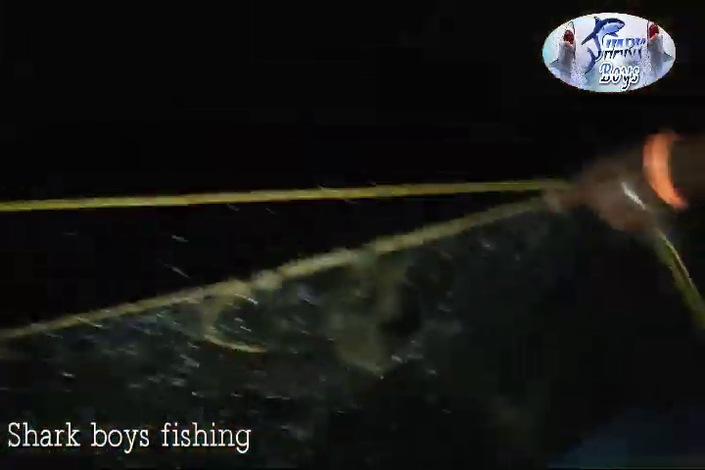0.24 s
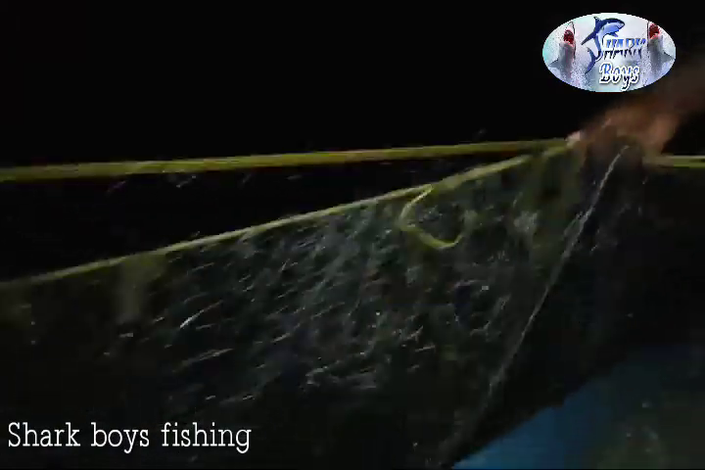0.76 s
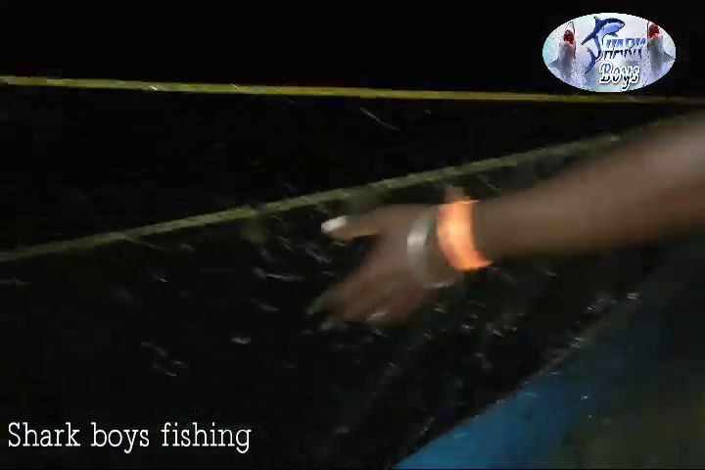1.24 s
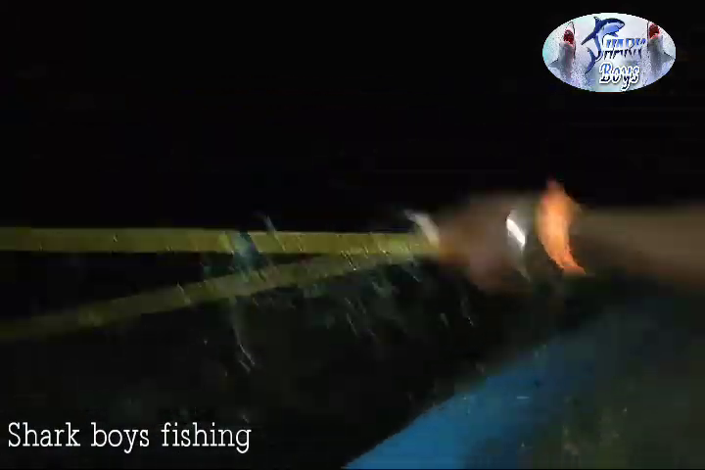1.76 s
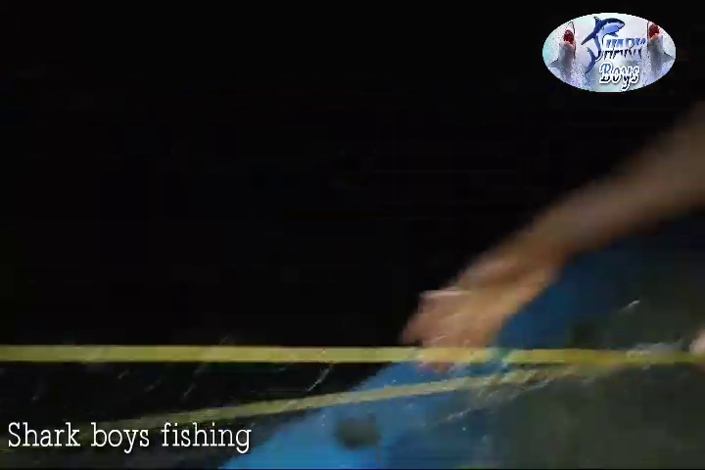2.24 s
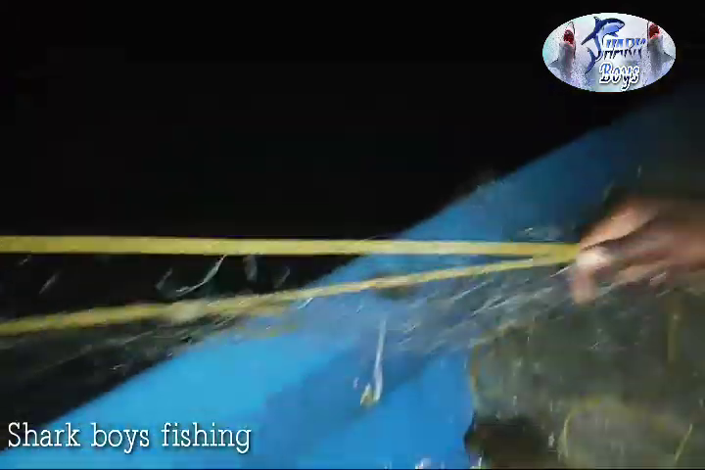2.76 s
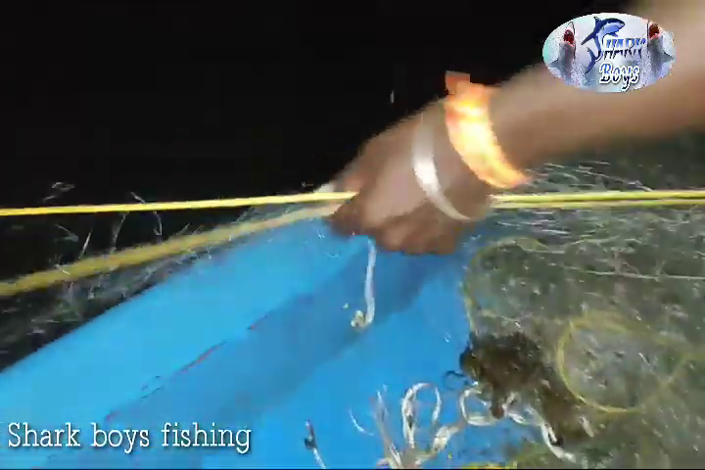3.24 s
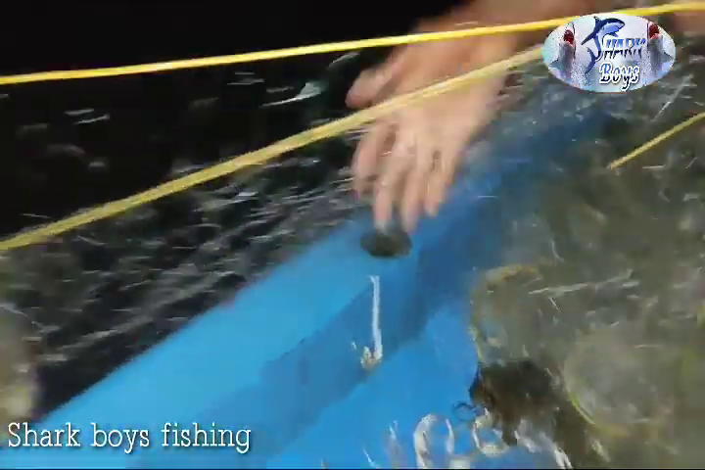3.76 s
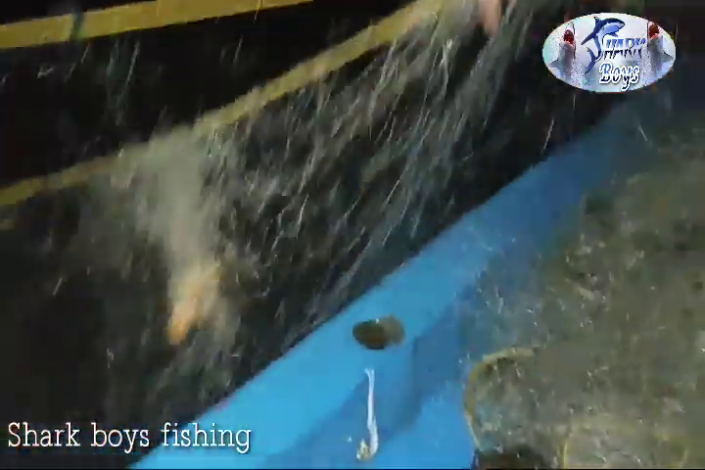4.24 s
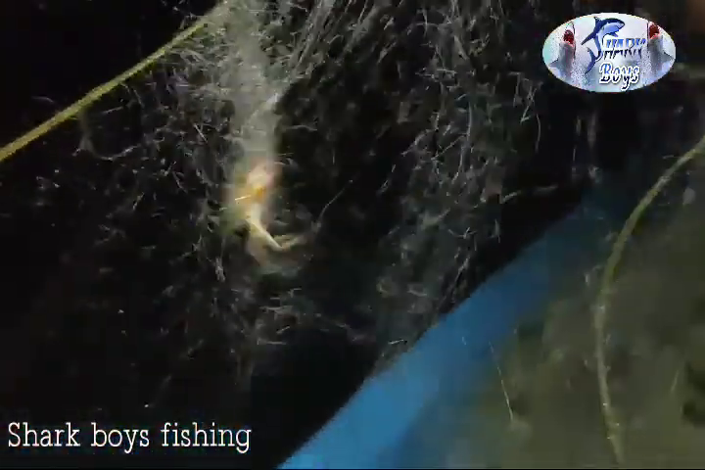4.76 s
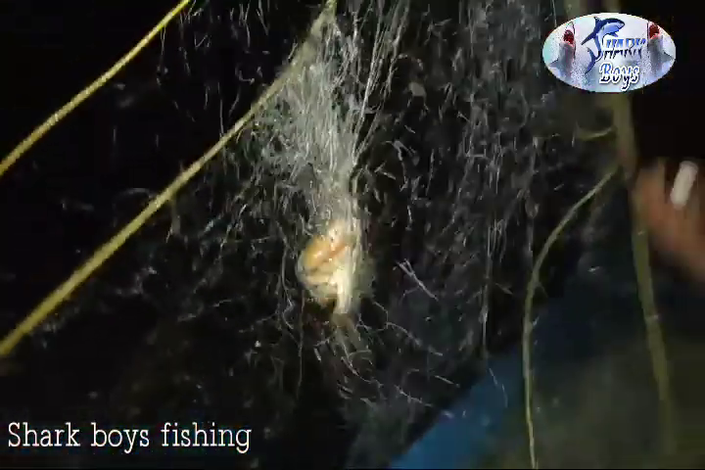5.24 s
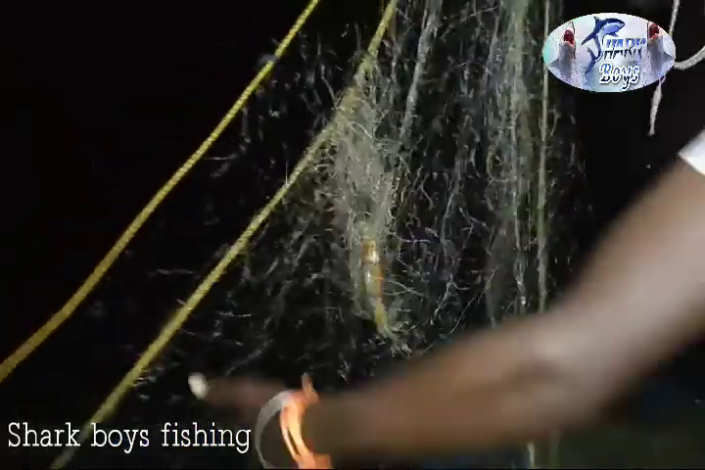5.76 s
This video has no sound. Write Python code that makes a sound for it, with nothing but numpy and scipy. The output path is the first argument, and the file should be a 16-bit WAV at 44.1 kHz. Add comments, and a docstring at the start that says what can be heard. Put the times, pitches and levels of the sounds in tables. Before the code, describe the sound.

Buffeting low wind noise dominates; beneath it a soaked fishing net rasps across a small boat's rim in strokes, knots ticking, insects faint.

```python
"""Strong wind buffets the two microphone ports of a phone on a small boat at night: eddies swept past.
The hull is knocked twice early on (damped modes), while a bush cricket chirps in pairs (filtered noise).
From about 1.2 s a wet net is dragged over the gunwale in strokes, hardest from 3 to 4.3 s; knots snap past.
The cricket, silent after about 2.1 s, returns at 4.6 s; drops (rising sines) cluster near 5.3 s.
Throughout, water and far insects hiss faintly and a small insect trills: shaped noise."""
import sys
import numpy as np
from scipy import signal
from scipy.fft import rfft, irfft
from scipy.io import wavfile
from scipy.ndimage import uniform_filter1d, map_coordinates

SR = 44100
rng = np.random.default_rng(int(sys.argv[2]) if len(sys.argv) > 2 else 0)


def pcm_store(signal):
    """Save signal as 16-bit PCM."""
    levels = np.round(np.clip(np.atleast_2d(signal), -1, 1) * 32767)
    wavfile.write(sys.argv[1], SR, levels.astype(np.int16).T)


def rack_gain(trim_db):
    """Turn a fader trim in dB into the linear factor to multiply a signal by."""
    fader = np.asarray(trim_db, float)
    return 10 ** (fader / 20)


N = 264600  # samples, 6 s

# air flow at the left port, sheltered until the phone turns near 3 s: t/s, level/dB, speed factor
LEFT_PORT_FLOW = [(0, -15, 0.44), (0.199, -20.5, 0.45), (.33, -25, 0.38), (.58, -15, 0.39),
                  (.72, -26, 0.39), (.88, -17, 0.37), (1.44, -21.5, 0.38), (1.659, -12.5, 0.32),
                  (1.93, -13, 0.46), (2.06, -9.5, 0.4), (2.27, -18, 0.4), (2.36, -9, 0.36),
                  (2.5, -13.5, 0.52), (2.91, -17, 0.49), (3.1, -20.5, 0.53), (3.449, -10, 0.52),
                  (3.6, -12, 0.4), (3.949, -10, .55), (4.2, -12.5, 0.61), (4.5, -10.5, 0.61),
                  (4.96, -11.5, 0.61), (5.2, -15, 0.42), (5.4, -23, 0.49), (5.52, -12, 0.5),
                  (5.848, -29, 0.44), (6, -6.5, 0.43)]
# air flow at the right port, which first faces the wind: t/s, level/dB, speed factor
RIGHT_PORT_FLOW = [(0, -13.5, 0.55), (0.089, -40, 0.36), (0.159, -11, 0.88), (0.501, -15.5, 0.93),
                   (0.75, -10.5, 0.89), (.98, -17.5, 0.82), (1.4, -9.5, 0.85), (1.97, -9, 1.132),
                   (2.299, -8.5, 0.83), (2.5, -13, 0.93), (2.78, -13, 1.037), (2.92, -13, 0.63),
                   (3.15, -15, 0.85), (3.36, -8, 1.005), (3.54, -16.5, 0.8), (3.63, -14, 1.3),
                   (3.82, -12.5, 1.3), (4.04, -15, 0.6), (4.161, -13.5, 0.73), (4.409, -12, .45),
                   (4.601, -14, 0.4), (4.87, -12.5, 0.54), (5.2, -16.5, 0.52), (5.33, -9, 0.65),
                   (5.54, -17, .37), (5.66, -12, 0.51), (5.772, -3, 0.56), (5.92, -11.5, 0.66),
                   (6, -25.5, 0.85)]
# brief spurts of flow: t/s, speed factor, port (0 left, 1 right)
FLOW_SPURTS = [(0.436, 1.57, 1), (0.621, 1.62, 1), (0.66, 1.85, 1), (0.78, 1.47, 1), (1.328, 1.28, 1),
               (1.629, 1.5, 1), (1.681, 1.28, 1), (1.768, 1.19, 1), (1.925, 1.57, 1), (2.024, 1.56, 1),
               (2.108, 2.4, 0), (2.301, 1.66, 1), (2.817, 2.75, 0), (3.776, 2.44, 0), (3.826, 1.35, 1),
               (3.862, 1.35, 1), (3.903, 3.02, 0), (3.965, 1.58, 1), (4.356, 2.21, 0), (4.396, 1.93, 0),
               (4.561, 2.48, 0), (4.576, 2.6, 0), (4.739, 2.27, 0), (4.812, 2.5, 0), (4.819, 2.74, 0),
               (4.846, 2.01, 1), (4.937, 2.68, 0), (4.975, 1.91, 0), (5.15, 2.43, 0), (5.282, 1.83, 1),
               (5.302, 1.58, 1), (5.405, 2.26, 1), (5.415, 2.51, 0), (5.669, 2.57, 0), (5.757, 2.0, 1),
               (5.77, 2.38, 1), (5.821, 1.55, 1)]
# relative spectrum of eddies passing a port at speed factor 1: f/Hz, level/dB (per Hz)
EDDY_SPECTRUM = [(10, -1.5), (50, 1.5), (110, -2.5), (180, -1.5), (280, -7), (420, -13.5), (650, -24.5),
                 (1000, -39), (1500, -54.5), (2500, -64), (6000, -100)]
# strong buffets at one port: t/s, pressure/full scale, port (0 left, 1 right)
BUFFETS = [(2.1055, -1.44, 1), (3.901, 0.87, 0), (4.5755, -1.34, 0), (4.8095, 1.59, 0), (4.814, -0.9, 0),
           (5.767, -1.594, 1), (5.774, -1.73, 1), (5.8153, -1.6, 1)]
# dull knocks on the hull: t/s, level/dB
HULL_KNOCKS = [(0.163, -18), (0.607, -11)]
# modes of the hull: f/Hz, relative level/dB, t60/s
HULL_MODES = [(188.7, 8.5, 0.096), (322, -7, 0.19)]
# pulls of the net over the edge: start t/s, length/s, first level/dB, last level/dB, brightness/dB
NET_PULLS = [(1.179, 0.34, -56, -49.5, -1.5), (1.552, 0.18, -52, -52.5, 6.5),
             (2.185, 0.065, -47.5, -51.5, 12.5), (2.285, 0.36, -51, -54.5, 4.5), (2.544, 0.13, -43, -43, 4),
             (2.689, 0.12, -40, -43.5, 0.5), (2.79, 0.091, -49, -44.5, 9.5), (2.908, 0.16, -56, -41, 4),
             (3.037, 0.14, -32.5, -28, -1), (3.186, 0.066, -27.5, -24.5, -0.5),
             (3.263, 0.089, -26, -24.5, 2), (3.36, 0.061, -23.5, -25.5, -6),
             (3.455, 0.37, -46.5, -54.5, -2.5), (3.928, 0.1, -49, -47, -0.5),
             (4.091, 0.028, -37, -30.5, -7), (4.128, 0.11, -25.5, -29.5, -9), (4.254, 0.054, -29, -35, -4),
             (4.44, 0.092, -38.5, -54, -3), (5.169, .13, -51.5, -41.5, -5.5),
             (5.33, 0.11, -51.5, -40.5, -8), (5.458, 0.082, -47, -46, -5.5), (5.626, 0.081, -49, -43, -3),
             (5.802, 0.066, -37.5, -52, -4.5)]
# relative spectrum of wet mesh rubbing the hull: f/Hz, level/dB (per Hz)
MESH_SPECTRUM = [(250, 10.5), (700, 13), (1100, 2), (1500, 5.5), (2000, -2), (2500, 2.5), (3000, 0.5),
                 (3500, 2), (4600, -6.5), (7000, -4), (9400, -3.5), (13500, -14), (15500, -25)]
# tones of the gunwale that the mesh sets ringing: f/Hz, width/Hz, relative level/dB
GUNWALE_TONES = [(850, 150, 4.5), (1078, 110, 9.5), (1870, 90, 4), (2170, 170, 3.5), (2430, 260, -4),
                 (2924, 300, 1), (4000, 220, 0)]
# knots snapping over the edge: t/s, level/dB, brightness/dB
KNOT_SNAPS = [(0.843, -56, 10), (2.178, -43, -3), (2.5628, -44, 0), (2.6574, -38, 0), (3.1472, -26, 7),
              (3.3423, -26, -2), (4.0954, -28.5, 2), (4.1598, -25.5, 7), (4.2648, -27, -2.5),
              (4.7221, -38, 13), (5.02, -38.5, 5), (5.1893, -41, 8), (5.2354, -39, 4), (5.317, -40, 10),
              (5.4731, -38, 1), (5.8132, -40, -1)]
# single drops: t/s, level/dB, starting f/Hz
WATER_DROPS = [(0.0553, -43, 3920), (0.065, -42, 3630), (0.2568, -45, 2700), (0.6216, -45, 4050),
               (1.5818, -46, 2740), (2.194, -41, 2937), (4.456, -35, 2800), (4.499, -41, 2871),
               (4.634, -47, 2596), (4.8398, -46, 3700), (5.255, -31, 1583), (5.2678, -33, 2180),
               (5.3, -40, 1710), (5.336, -35, 1490), (5.3851, -39, 3630), (5.4233, -34, 2683)]
# first chirp of each pair: t/s, level/dB
CHIRP_PAIRS = [(0.0962, -52), (0.357, -46), (0.6875, -45), (0.984, -47.5), (1.303, -48), (1.756, -48.5),
               (2.03, -48), (4.6414, -47), (4.96, -51), (5.215, -52), (5.3567, -49.5), (5.7067, -45.5),
               (5.96, -52)]
# relative spectrum of water and far insects: f/Hz, level/dB (per Hz)
NIGHT_SPECTRUM = [(880, -46), (1500, 3), (2400, 1.5), (4750, -4.5), (6300, -1), (7520, -4.5), (8290, 4),
                  (9790, 1), (12000, 6), (14300, -1), (15500, -58)]

LAG = 17  # samples by which sound reaches the left port later
SLAM_S, COLLAPSE_S = 0.00206, 0.00071  # build-up and sudden release of a buffet
FLUTTER_HZ, FLUTTER_S = 615, 0.0031  # the flutter that follows
NET_LIKE = 0.4  # share of the rubbing that both ports hear alike
GRIP_S, LET_GO_DB_PER_S = 0.011, 291  # a pull takes hold fast and dies away once the hand lets go
TRICKLE_DB, TRICKLE_BRIGHT_DB = -56, -2.5  # water that runs off the mesh between pulls
HISS_DB = -52.5  # before the tilt between the ports
TRILL_HZ, TRILL_PER_S, TRILL_DB = 6810, 32, -63.5  # a small insect that never stops


def evened(x):
    """Normalization: scales to rms 1."""
    return x / np.sqrt(np.mean(x ** 2) + 1e-20)


def coloured(x, points):
    """Linear filtering: weights the spectrum of the last axis by points of (f/Hz, level/dB)."""
    f, db = np.transpose(points)
    hz = np.fft.rfftfreq(x.shape[-1], 1 / SR)
    gain = rack_gain(np.interp(np.log(hz + 1), np.log(f + 1), db))
    return irfft(rfft(x) * gain, x.shape[-1])


def filtered(x, order, hz, kind):
    """Causal filtering: a Butterworth filter of the given order and corner frequencies."""
    return signal.sosfilt(signal.butter(order, hz, kind, fs=SR, output="sos"), x)


def wander(hz):
    """Low-passed noise: smooth chance of rms 1 that changes about hz times a second."""
    f = np.fft.rfftfreq(N, 1 / SR)
    return evened(irfft(rfft(rng.standard_normal(N)) / (1 + (f / hz) ** 2), N))


def add(mix, s, sound):
    """Superposition: mixes a sound in at s seconds."""
    part = mix[round(s * SR):][:len(sound)]
    part += sound[:len(part)]


def ports(x, like, pan_db):
    """Partial coherence: row 0 reaches both ports, the left later; rows 1 and 2 only one port each."""
    like = np.clip(like, 0, 1)
    shared = np.array([np.roll(x[0], LAG), x[0]])
    both = np.sqrt(like) * shared + np.sqrt(1 - like) * x[1:]
    return both * rack_gain(np.array([[pan_db / 2], [-pan_db / 2]]))


def specks(per_s, spread_db):
    """Random impulse process: three sparse trains of clicks of either sign; a few are large."""
    size_db = spread_db * np.minimum(rng.exponential(1, (3, N)), 4)
    size = rack_gain(size_db) * rng.choice([-1, 1], (3, N))
    return evened(size * (rng.random((3, N)) < per_s / SR))


def patchy(x, depth_db):
    """Time-frequency modulation: raises and lowers patches a few hundred Hz wide and tens of ms long."""
    z = signal.stft(x, SR, nperseg=512)[2]
    patches = rng.standard_normal(z.shape[1:])
    patches = uniform_filter1d(patches, size=5, axis=0)
    patches = evened(uniform_filter1d(patches, size=6, axis=1))
    return signal.istft(z * rack_gain(depth_db * patches), SR, nperseg=512)[1][:, :N]


def wind(level_db, speed, spurts, unrest, lumps_db, suction):
    """Frozen turbulence: a fixed eddy pattern is swept past the port, and faster flow raises its pitch."""
    t = np.arange(N) / SR
    rush = unrest * np.tanh(0.6 * wander(73.52))  # bounded wobble of the log speed
    push = np.zeros(N)  # log speed added by the spurts
    for s, factor in spurts:
        push += np.log(factor) * np.exp(-((t - s - 0.002) / 0.006) ** 2)
    flow = np.clip(speed, 0.1, 3) * np.exp(rush + push)
    pattern = evened(coloured(rng.standard_normal(2 ** 18), EDDY_SPECTRUM))
    air = map_coordinates(pattern, [np.cumsum(flow)], order=3, mode="wrap")
    # faster flow is also louder
    air = evened(air * rack_gain(lumps_db * wander(4.4)) * np.exp(1.6 * rush)) * np.exp(0.13 * push)
    # large slow eddies heave the diaphragm and stand out where the port is sheltered
    heave_spectrum = [(6, 2.0), (22, 4.5), (45, -1.5), (90, -28.0), (250, -33.5), (900, -100)]
    heave = evened(coloured(rng.standard_normal(N), heave_spectrum))
    share = np.clip(1.0 - 1.13 * speed, 0.03, 0.9)
    air = np.sqrt(1 - share) * air + np.sqrt(share) * heave
    air = air - 0.71 * push  # a spurt sucks the pressure down
    # a spurt sheds a few quick, uneven vortices
    shed = np.cumsum(150 * np.exp(0.8 * push + 0.35 * wander(119.5))) / SR
    air = air + 1.1 * push * np.sin(2 * np.pi * shed)
    # suction dips are sharper than pressure humps
    air = evened(air - suction * (9 * np.tanh(air ** 2 / 9) - 1))
    return air * rack_gain(level_db)


def slams():
    """Transient pressure: a buffet builds, lets go suddenly and flutters out as a damped sine."""
    t, out = np.arange(N) / SR, np.zeros((2, N))
    for s, size, port in BUFFETS:
        after = np.maximum(t - s, 0)
        flutter = 0.28 * np.sin(2 * np.pi * FLUTTER_HZ * after) * np.exp(-after / FLUTTER_S)
        bump = np.exp(-((t - s) / np.where(t < s, SLAM_S, COLLAPSE_S)) ** 2)
        out[round(port)] += size * (bump - flutter)
    return out


def knocks():
    """Modal decay: the hull rings briefly in damped modes when something bumps it."""
    out, t = np.zeros(N), np.arange(SR // 4) / SR
    ring = np.zeros(len(t))
    for hz, db, t60 in HULL_MODES:
        ring += rack_gain(db - 60 * t / t60) * np.sin(2 * np.pi * hz * t)
    ring *= 1 - np.exp(-t / 0.002)
    for s, db in HULL_KNOCKS:
        add(out, s, rack_gain(db) * ring)
    return out


def net():
    """Stick-slip friction: dense slips of wet twine plus crackles drive the hull and gunwale."""
    level_db, bright_db = pulls()
    unevenness = rack_gain(1.7 * wander(66.0) + 1.13 * wander(6.5))
    slips = rng.standard_normal((3, N)) * unevenness + 0.28 * specks(600, 0.7)
    rub = patchy(coloured(slips, MESH_SPECTRUM), 2.9)
    rub = evened(rub) + 0.6 * gunwale(slips, 3.2)
    # brightness tilts the top against the hull tones
    top = signal.sosfiltfilt(signal.butter(2, 5000, "high", fs=SR, output="sos"), rub)
    low = filtered(rub, 2, 1300, "low")
    body = evened(rub - top + (rack_gain(-0.4 * bright_db) - 1) * low)
    rub = body + rack_gain(-4.0 + bright_db) * evened(top)
    # water dribbling off the mesh: short rings that stand out when the rubbing is dull and soft
    u = np.arange(140) / SR
    dribble = np.zeros((3, N))
    for hz in np.geomspace(1000, 3400, 8):
        ring = np.sin(2 * np.pi * hz * u * (1 + 1.8 * u)) * np.hanning(len(u)) ** 3
        dribble += signal.oaconvolve(specks(80, 4.9), ring[None], axes=1)[:, :N]
    dribble = evened(dribble)
    wet = np.clip(-bright_db / 13, 0.05, 0.8) * np.clip((-33 - level_db) / 8, 0.1, 1)  # share of dribble
    blend = np.sqrt(1 - wet) * rub + np.sqrt(wet) * dribble
    return ports(blend * rack_gain(level_db), NET_LIKE, 4.1)


def pulls():
    """Power addition: the pulls add to the steady trickle, giving level and power-weighted brightness."""
    t = np.arange(N) / SR
    power = np.full(N, rack_gain(2 * TRICKLE_DB))
    tint = power * TRICKLE_BRIGHT_DB
    for s, length, first_db, last_db, bright_db in NET_PULLS:
        held_db = np.interp(t, [s, s + length], [first_db, last_db])
        held_db = held_db - LET_GO_DB_PER_S * np.maximum(t - s - length, 0)
        part = (np.clip((t - s) / GRIP_S, 0, 1) * rack_gain(held_db)) ** 2
        power = power + part
        tint = tint + part * bright_db
    return 10 * np.log10(power), tint / power


def gunwale(drive, flare_db):
    """Resonance: each tone of the edge rings under the drive and flares as twine finds or loses its spot."""
    out = 0
    for hz, width, db in GUNWALE_TONES:
        tone = evened(signal.lfilter(*signal.iirpeak(hz, hz / width, SR), drive))
        out = out + rack_gain(db + flare_db * wander(7.4)) * tone
    return evened(out)


def knots_and_drops():
    """Impact and bubble ringing: knots tick with a puff, longer when strong; drops ring and rise in pitch."""
    out, t = np.zeros((3, N)), np.arange(900) / SR
    puffs = coloured(rng.standard_normal((len(KNOT_SNAPS), 3, len(t))), MESH_SPECTRUM)
    tops = filtered(puffs, 3, 4500, "high")
    bodies = filtered(puffs, 2, [900, 4500], "band")
    for (s, db, bright_db), body, top in zip(KNOT_SNAPS, bodies, tops):
        fade_s = 0.0029 + 0.0018 * rack_gain((db + 3) / 2)
        puff = (evened(body) * rack_gain(-bright_db) + evened(top)) * np.exp(-t / fade_s)
        add(out.T, s, rack_gain(db) * puff.T)
    for s, db, hz in WATER_DROPS:
        swell = (1 - np.exp(-t / 0.0006)) * np.exp(-t / 0.0015)
        ring = np.sin(2 * np.pi * hz * t * (1 + 6.0 * t)) * swell
        add(out[0], s, rack_gain(db + 12.0) * ring)  # the gain offsets the short swell
    return ports(out, 0.64, 9.1)


def cricket():
    """Stridulation: wing teeth scrape a broad high resonance, two strokes to a call."""
    strokes = np.zeros(N)
    for s, db in CHIRP_PAIRS:
        add(strokes, s, rack_gain(db - 1.5) * signal.windows.tukey(round(0.038 * SR), 0.7))
        add(strokes, s + 0.047, rack_gain(db - 2.5) * signal.windows.tukey(round(0.066 * SR), 0.7))
    resonance = [(9000, -42), (10500, -12.5), (11800, -1), (13000, -9), (14200, -13), (15500, -45)]
    wing = coloured(rng.standard_normal((3, N)), resonance)
    return ports(evened(wing) * strokes, 0.18, 9.3)


def night():
    """Diffuse noise: hiss of water and far insects, unlike at the two ports, and one steady trill."""
    hiss = patchy(coloured(rng.standard_normal((2, N)), NIGHT_SPECTRUM), 2.8)
    hiss = rack_gain(HISS_DB) * evened(hiss) * rack_gain(np.array([[2.0], [-2.0]]))
    beats = np.cumsum(TRILL_PER_S * (1 + 0.024 * wander(1.54))) / SR
    wing = filtered(rng.standard_normal((3, N)), 2, [TRILL_HZ - 230, TRILL_HZ + 230], "band")
    trill = evened(wing * (0.3 + np.sin(np.pi * beats) ** 2)) * rack_gain(TRILL_DB + wander(0.8))
    return hiss + ports(trill, 0.2, 6.1)


def scene():
    """Superposition: wind unrelated at each port, over everything that arrives as sound."""
    t = np.arange(N) / SR
    flows = []
    for table in (LEFT_PORT_FLOW, RIGHT_PORT_FLOW):
        s, level_db, speed = np.transpose(table)
        flows.append((np.interp(t, s, level_db), np.interp(t, s, speed)))
    spurts = [[row[:2] for row in FLOW_SPURTS if round(row[2]) == port] for port in range(2)]
    left = wind(*flows[0], spurts[0], unrest=0.36, lumps_db=1.86, suction=0.14)
    right = wind(*flows[1], spurts[1], unrest=0.25, lumps_db=0.5, suction=0.022)
    shove = slams()
    # near a buffet the other eddies give way
    air = np.array([left, right]) * np.clip(1 - 0.34 * abs(shove), 0, 1) + shove
    return air + knocks() + net() + knots_and_drops() + cricket() + night()


def top_cut(x):
    """Nothing passes above the cut-off."""
    return signal.sosfilt(signal.butter(12, 15700, fs=SR, output="sos"), x)


def record(dry):
    """Overload: with the steady offset blocked, the strongest buffets are clipped at full scale."""
    centred = dry - dry.mean(1, keepdims=True)
    mix = np.clip(centred, -1, 1)
    return top_cut(mix)


dry = scene()
out = record(dry)
pcm_store(out)
```